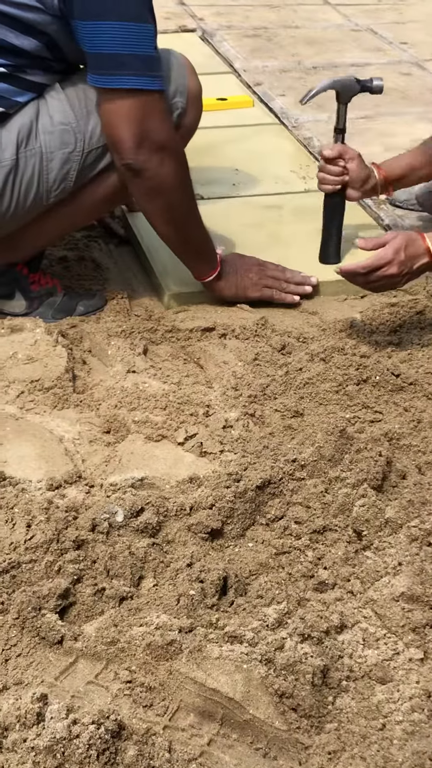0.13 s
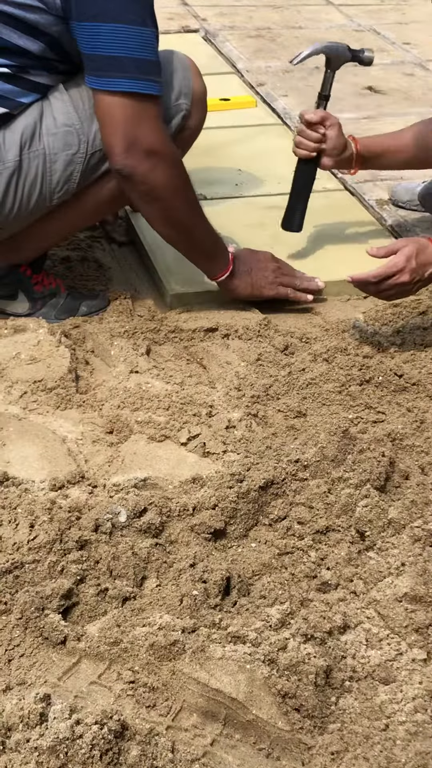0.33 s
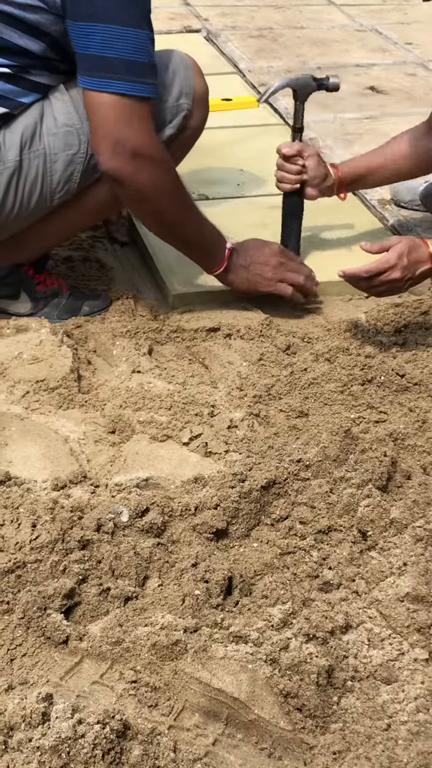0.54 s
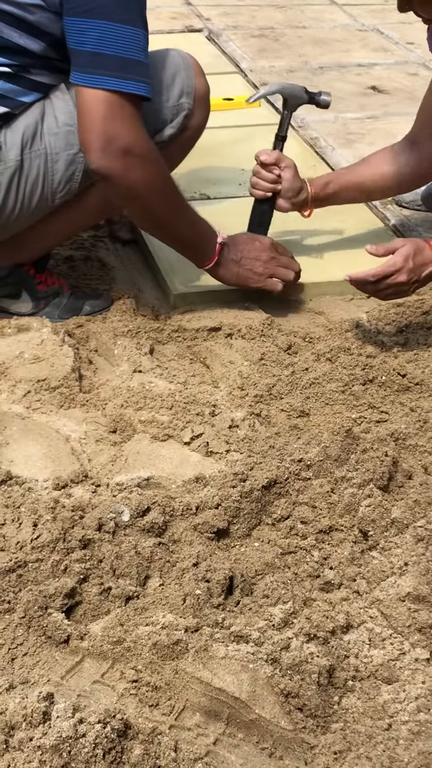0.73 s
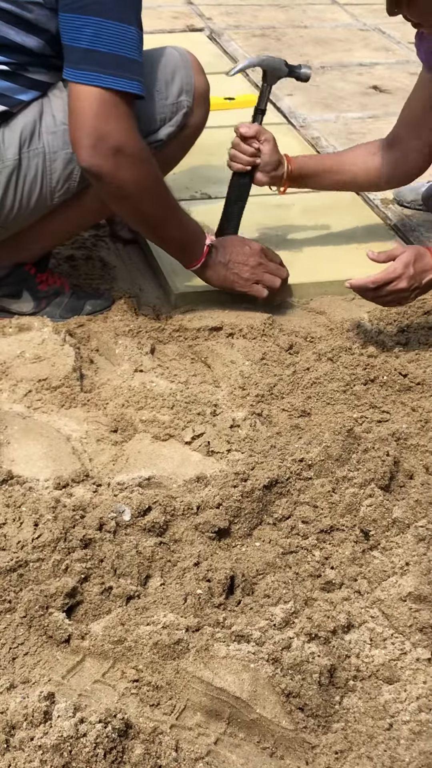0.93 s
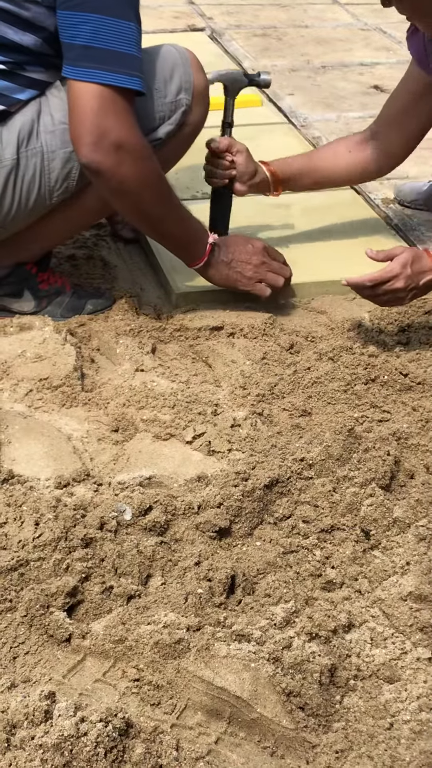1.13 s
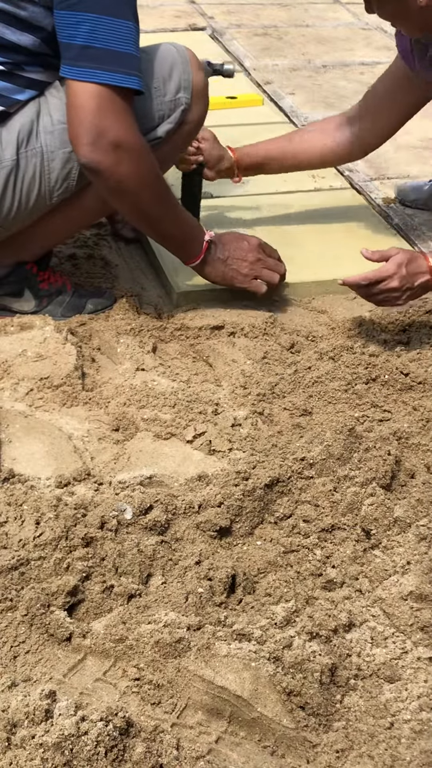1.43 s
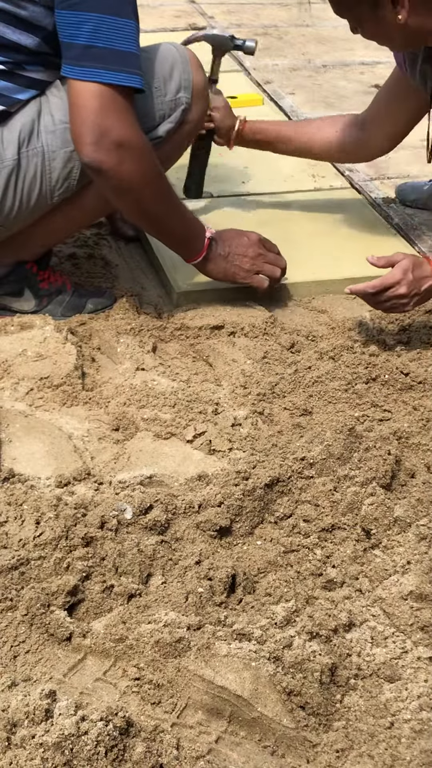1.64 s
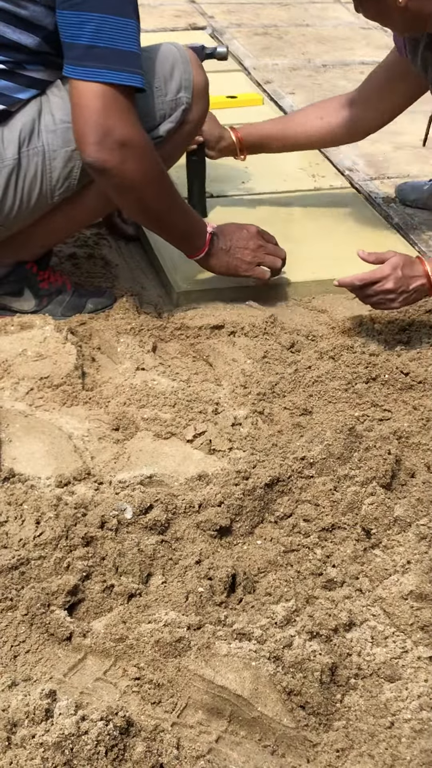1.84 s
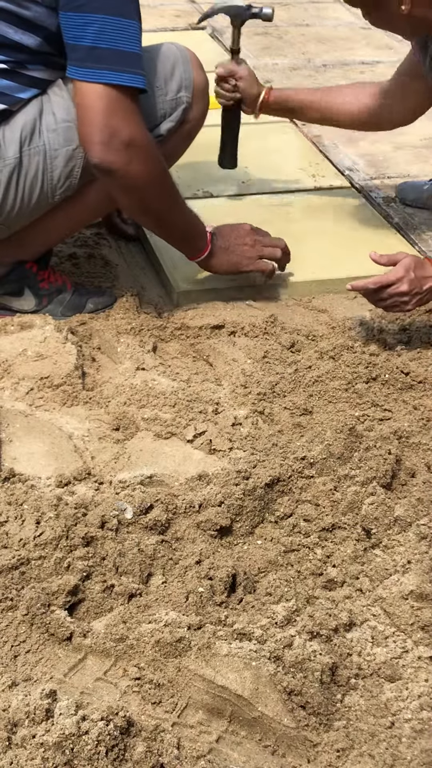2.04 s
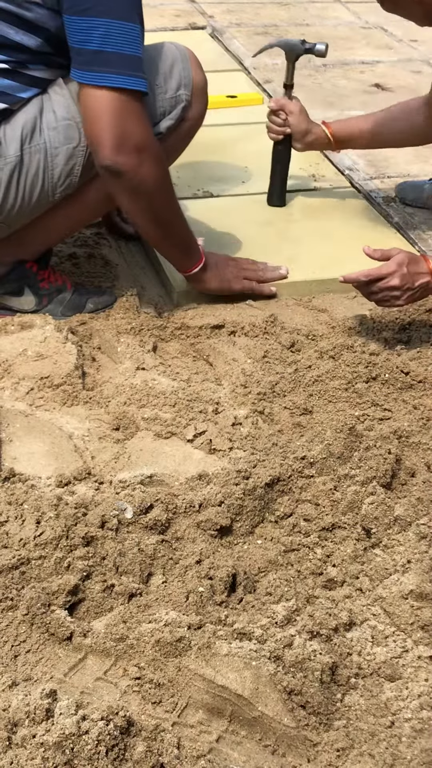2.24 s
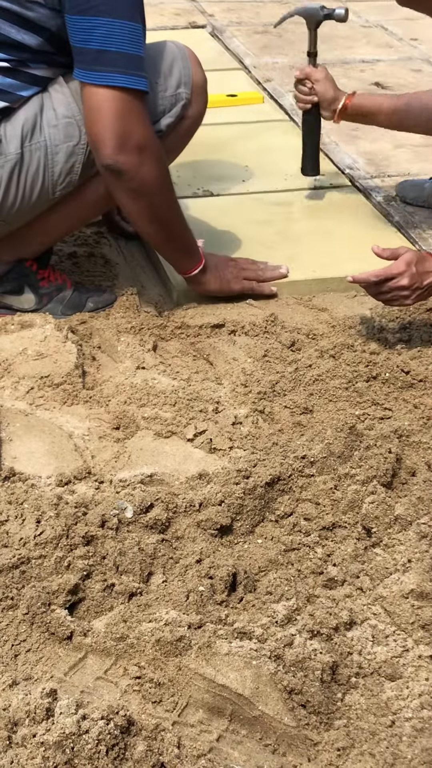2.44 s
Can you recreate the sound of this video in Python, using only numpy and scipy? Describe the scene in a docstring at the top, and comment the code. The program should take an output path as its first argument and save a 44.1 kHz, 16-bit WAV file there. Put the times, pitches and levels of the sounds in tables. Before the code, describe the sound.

Seven dull hammer-handle knocks on a paving slab bedded in sand, with tiny metallic clinks outdoors

```python
"""First a low outdoor rumble with hiss and a soft scuff of sand, then seven hammer-handle knocks.
The butt strikes a paving slab bedded in sand: each blow is a slab bounce, damped ringing modes and
a noise tick, with a late low thump from the ground. Something small and metallic, perhaps a bracelet,
clinks around the blows (shaped noise and sines). Scuffs are grainy band noise; a faint far-off tone
comes and goes twice. One microphone hears it all, with a short diffuse tail and one near reflection."""
import sys
import numpy as np
from scipy import signal
from scipy.fft import rfft, irfft
from scipy.io import wavfile

SR = 44100
rng = np.random.default_rng(int(sys.argv[2]) if len(sys.argv) > 2 else 0)


def transcribe(u):
    """Save the signal u as a 16-bit wav file named by the first command-line argument.

    u: samples, shape (n,) or (channels, n), limited to [-1, 1]; the rate is SR.
    q: integer samples, one column per channel.
    """
    v = np.clip(np.atleast_2d(u).T, -1, 1)
    q = np.round(v * 32767).astype(np.int16)
    wavfile.write(sys.argv[1], SR, q)


N = 114660  # length of the scene [samples]
T = np.arange(int(0.4 * SR)) / SR  # time within one short sound [s]

# The blows: (time [s], strength [dB], overtones [dB], edge modes [dB], 1 kHz ring [dB],
#             contact tick [dB], tick tilt [dB per octave], overtone tuning [ratio])
KNOCKS = [(0.2036, 2, 4.5, -2.5, 2.5, -41, 1.5, 1.023), (0.5209, -1, -9, -2.5, -3.5, -42.5, 0.5, 1.027),
          (0.8198, -2, -18.5, -11.5, -25, -43.5, -2.5, 0.98), (1.105, -4.5, -20.5, -9, -20, -52.5, 2, 1.03),
          (1.4303, -4, -62, -10, -10.5, -50, 1.5, 0.74), (1.807, -2, -9.5, 2, -12, -44, 1, 0.894),
          (2.262, -1, 1, -5.5, 3, -35, -2, 1)]
# Slab overtones before each blow's tuning and level: (pitch [Hz], level [dB], t60 [s])
OVERTONES = [(286.2, -15, 0.038), (344.4, -21, 0.033), (467.6, -20.5, 0.034), (520.6, -24, 0.023)]
# Modes that ring more for some striking places: (pitch [Hz], level [dB], t60 [s])
EDGE_MODES = [(429, -28.5, 0.039), (690, -28.5, 0.033), (774, -35.5, 0.043), (1673, -36.5, 0.03),
              (1860, -34, 0.012)]
# The slab's ring near 1 kHz, with its own level in each blow: (pitch [Hz], level [dB], t60 [s])
KILOHERTZ_RING = [(992.4, -30.5, 0.04), (1103, -40.5, 0.028)]
# Spectrum of the contact tick before tilt: (frequency [Hz], relative level [dB])
TICK_SPECTRUM = [(300, 12), (1200, -9.5), (2800, -6), (4500, -13), (6800, -6), (8500, -24.5), (16000, -22)]
# The late answer of the ground: (pitch [Hz], level [dB], t60 [s], lag [s])
GROUND_MODES = [(58.6, -24, .12, 0.0162), (118.2, -44, 0.47, 0.01976), (171.6, -33.5, 0.19, 0.03145)]
# Metal contacts: (time [s], level [dB], tilt [dB per octave], ring [dB])
CLINKS = [(0.3251, -59, -4, -24), (0.5327, -33, -0.5, -7), (0.561, -59, -3, 3), (0.8163, -47.5, -2, -10),
          (.832, -47, -2, -7), (1.0972, -44, -5, -4), (1.118, -54.5, -7, -5), (1.144, -59, -5, -10),
          (1.4692, -43.5, -5, -1), (1.4798, -48, -13.5, 4), (1.5361, -47.5, -7, -12),
          (1.834, -62, -13, -10), (1.8553, -52.5, -10.5, -14), (1.9014, -50.5, -5, -13),
          (2.289, -57.5, -12, -14), (2.3432, -47.5, -3, -10), (2.3502, -57, 4, -12),
          (2.4631, -45.5, -1, -3), (2.4912, -52, -4, -3)]
# Spectrum of the metal snap before tilt: (frequency [Hz], relative level [dB])
CLINK_SPECTRUM = [(1500, -46), (3000, -24), (4300, 1.5), (5100, -23.5), (6300, 8), (7600, 0), (8900, 3.5),
                  (10800, 2), (12000, 2.5), (13500, -1.5), (16000, -2)]
# Pitches at which the metal rings: (pitch [Hz])
CLINK_HZ = [6700, 8270, 11970, 12470, 15000]
# Ring of each of those pitches: (relative level [dB], t60 [s])
CLINK_MODES = [(-20, .045), (-28, 0.055), (-12, .065), (-54, 0.033), (-43, 0.032)]
# Sand under hands and slab: (time [s], length [s], level [dB], centre [Hz])
SCUFFS = [(0.094, 0.096, -69, 5600), (0.107, 0.027, -64.5, 2450), (0.206, 0.12, -73, 5900),
          (.42, 0.073, -70.5, 5650), (0.868, 0.031, -60.5, 1600), (0.869, 0.036, -69, 5440),
          (0.877, 0.28, -70.5, 1830), (2.028, 0.091, -75, 3420), (2.282, 0.056, -68.5, 5840)]
# Far-off tones: (time [s], length [s], level [dB], pitch halfway [Hz])
FAR_TONES = [(0.941, 0.21, -62.5, 961), (1.621, 0.13, -65.5, 960)]
# Spectrum of the outdoor air: (frequency [Hz], relative level [dB])
AIR_SPECTRUM = [(12, -21), (20, -1.5), (70, 3), (198, -11), (277, -16.5), (367, -22), (698, -24),
                (825, -25.5), (949, -21.5), (1260, -27.5), (2820, -34), (3630, -32.5), (4540, -37.5),
                (5680, -37.5), (10200, -44), (14300, -44), (16000, -47.5)]
# Decay of the diffuse outdoor tail: (frequency [Hz], t60 [s])
YARD_DECAY = [(100, 0.051), (300, 0.21), (1000, 0.29), (4000, 0.07), (12000, 0.27)]

# The whole slab on its bed
BOUNCE_HZ, BOUNCE_DB, BOUNCE_T60_S, BOUNCE_RISE_S, BOUNCE_LAG_S = 181.3, -9, 0.038, 0.0039, 0.0012
FULL_BRIGHT_HZ = 454  # from this pitch up, a blow's overtone dB applies in full
MODE_RISE_S = 0.0026  # overtones, edge modes and 1 kHz ring
TICK_T60_S, TICK_TAIL_DB, TICK_TAIL_T60_S = 0.016, -14, 0.12
# The hard first instant of contact
CRACK_HZ, CRACK_DB, CRACK_T60_S, CRACK_RISE_S = 2890, 10.5, 0.0018, 0.00015
GROUND_RISE_S = 0.002
CLINK_T60_S, CLINK_TAIL_DB, CLINK_TAIL_T60_S, CLINK_RISE_S = 0.0067, -18, 0.096, 0.00034
FAINT_PER_S, FAINT_DB, FAINT_SPREAD_DB = 15, -64, 5  # the clinks that fall at random
SCUFF_OCTAVES, SCUFF_GRAIN_DB = 0.38, 3
AIR_DB, AIR_WAVER_DB, RUMBLE_TOP_HZ = -53, 2.92, 302
FAR_RISE_HZ_PER_S, FAR_WOBBLE_HZ, FAR_FLUTTER_DB = 120, 23.7, 3.5
YARD_DB, CLINK_YARD_DB, YARD_GAP_S = -12.5, -26.5, 0.0067
WALL_S, WALL_DB, WALL_TOP_HZ = 0.0275, -24, 1500  # one near reflection
LOW_CUT_HZ, EDGE_HZ = 31, 16000  # the microphone's range


def amp(db):
    """Decibels to gain."""
    return 10 ** (np.asarray(db) / 20)


def unit(x):
    """Scales to rms 1."""
    return x / np.sqrt(np.mean(x ** 2) + 1e-20)


def read(points, hz):
    """Reads a table on a log-frequency axis."""
    f, value = np.transpose(points)
    return np.interp(np.log(hz + 1), np.log(f + 1), value)


def add(mix, s, sound):
    """Mixes a sound in at time s, cut off at the end of the mix."""
    part = mix[max(round(s * SR), 0):][:len(sound)]
    part += sound[:len(part)]


def fade(t, t60):
    """Exponential decay, 60 dB down after t60 seconds."""
    return np.exp(-np.log(1000) * t / t60)


def mode(hz, db, t60, rise_s, lag_s=0):
    """A damped sine that swells in after a lag."""
    t = np.maximum(T - lag_s, 0)
    swell = 1 - np.exp(-t / rise_s)
    return amp(db) * swell * fade(t, t60) * np.sin(2 * np.pi * hz * t)


def noise(points, size, tilt_db=0):
    """Noise of rms 1 with a given spectrum, tilted above 1 kHz by so many dB per octave."""
    hz = np.fft.rfftfreq(size, 1 / SR)
    db = read(points, hz) + tilt_db * np.log2(np.maximum(hz, 1000) / 1000)
    return unit(irfft(rfft(rng.standard_normal(size)) * amp(db), size))


def band(x, hz, octaves):
    """Keeps a bell-shaped band, at rms 1."""
    away = np.log2((np.fft.rfftfreq(len(x), 1 / SR) + 1) / hz) / octaves
    return unit(irfft(rfft(x) * np.exp(-0.5 * away ** 2), len(x)))


def lowpass(top_hz):
    """A second-order filter that keeps what lies below top_hz."""
    return signal.butter(2, top_hz, fs=SR, output="sos")


def slab_ring(bright_db, edge_db, kilohertz_db, tuning):
    """The slab bounces on its bed and rings the modes that the striking place favours."""
    ring = mode(BOUNCE_HZ, BOUNCE_DB, BOUNCE_T60_S, BOUNCE_RISE_S, BOUNCE_LAG_S)
    for hz, db, t60 in OVERTONES:
        # The blow's brightness counts more the higher the overtone lies above the bounce
        share = np.clip(np.log(hz / BOUNCE_HZ) / np.log(FULL_BRIGHT_HZ / BOUNCE_HZ), 0, 1)
        ring = ring - mode(hz * tuning, db + share * bright_db, t60, MODE_RISE_S)
    for modes, place_db in (EDGE_MODES, edge_db), (KILOHERTZ_RING, kilohertz_db):
        for hz, db, t60 in modes:
            ring = ring - mode(hz, db + place_db, t60, MODE_RISE_S)
    return ring


def contact_tick(tilt_db):
    """The handle meets stone: a noise burst with a weaker, longer tail, plus a very short crack."""
    decay = fade(T, TICK_T60_S) + amp(TICK_TAIL_DB) * fade(T, TICK_TAIL_T60_S)
    burst = noise(TICK_SPECTRUM, len(T), tilt_db) * decay
    return burst + mode(CRACK_HZ, CRACK_DB, CRACK_T60_S, CRACK_RISE_S)


def slab():
    """Ring and contact tick of every blow, with the outdoor tail and a dull near reflection."""
    direct = np.zeros(N)
    for s, db, bright_db, edge_db, kilohertz_db, tick_db, tilt_db, tuning in KNOCKS:
        ring = slab_ring(bright_db, edge_db, kilohertz_db, tuning)
        add(direct, s, amp(db) * ring + amp(tick_db) * contact_tick(tilt_db))
    heard = direct + amp(YARD_DB) * yard(direct)
    reflection = signal.sosfilt(lowpass(WALL_TOP_HZ), direct)
    add(heard, WALL_S, amp(WALL_DB) * reflection)
    return heard


def ground():
    """A low, late thump from the ground under every blow, made of lagging damped modes."""
    out = np.zeros(N)
    thump = -sum(mode(hz, db, t60, GROUND_RISE_S, lag) for hz, db, t60, lag in GROUND_MODES)
    for s, db, *_ in KNOCKS:
        add(out, s, amp(db) * thump)
    return out


def clinks():
    """Tiny metal contacts: a bright noise snap with a brief high ring; faint snaps fall at random."""
    out = np.zeros(N)
    decay = fade(T, CLINK_T60_S) + amp(CLINK_TAIL_DB) * fade(T, CLINK_TAIL_T60_S)
    ring = sum(mode(hz, db, t60, CLINK_RISE_S) for hz, (db, t60) in zip(CLINK_HZ, CLINK_MODES))
    for s, db, tilt_db, ring_db in CLINKS:
        snap = noise(CLINK_SPECTRUM, len(T), tilt_db) * decay
        add(out, s, amp(db) * (snap + amp(ring_db) * ring))
    hits = rng.random(N) < FAINT_PER_S / SR
    faint = hits * amp(FAINT_DB + FAINT_SPREAD_DB * rng.standard_normal(N))
    out += signal.fftconvolve(faint, noise(CLINK_SPECTRUM, len(T)) * decay)[:N]
    return out + amp(CLINK_YARD_DB) * yard(out)


def scuffs():
    """Short rubs of sand: band noise with uneven grains that starts quickly and trails off."""
    out = np.zeros(N)
    for s, length, db, hz in SCUFFS:
        grains = rng.standard_normal(len(T)) * amp(SCUFF_GRAIN_DB * rng.exponential(1, len(T)))
        swell = np.sin(np.pi * np.minimum(T / length, 1) ** 0.38)  # power below 1: early peak
        add(out, s, amp(db) * swell * band(grains, hz, SCUFF_OCTAVES))
    return out


def yard(x):
    """Short diffuse outdoor tail: noise that swells in, then dies at its own speed in each band."""
    hz, t, z = signal.stft(rng.standard_normal(len(T)), SR, nperseg=256)
    decaying = z * fade(t, read(YARD_DECAY, hz)[:, None])
    tail = signal.istft(decaying, SR, nperseg=256)[1][:len(T)]
    tail = tail * np.minimum(T / YARD_GAP_S, 1) ** 2
    return signal.fftconvolve(x, tail / np.linalg.norm(tail))[:N]


def far_tone(length, db, hz):
    """A distant tone: a sine that rises in pitch, wobbles and flutters in level under one swell."""
    wobble = noise([(1, 0), (60, 0), (200, -60)], len(T))
    pitch = hz + FAR_RISE_HZ_PER_S * (T - length / 2) + FAR_WOBBLE_HZ * wobble
    flutter = noise([(1, 0), (20, 0), (60, -60)], len(T))
    swell = amp(db + FAR_FLUTTER_DB * flutter) * np.sin(np.pi * np.minimum(T / length, 1))
    return swell * np.sin(2 * np.pi * np.cumsum(pitch) / SR)


def outdoors():
    """Background air: steady hiss over a low rumble of slowly wavering level, with the far tones."""
    waver = noise([(1, 0), (8, -3), (30, -40), (100, -120)], N)
    air = amp(AIR_DB) * noise(AIR_SPECTRUM, N)
    rumble = signal.sosfiltfilt(lowpass(RUMBLE_TOP_HZ), air)
    out = air + rumble * (amp(AIR_WAVER_DB * waver) - 1)  # only the rumble wavers
    for s, length, db, hz in FAR_TONES:
        add(out, s, far_tone(length, db, hz))
    return out


def scene():
    """All sources, near and far, at one microphone."""
    return (slab() + ground() + clinks() + scuffs() + outdoors())[None]


def record(dry):
    """The microphone sheds the deepest bass, then a steep filter limits the treble."""
    thinned = signal.sosfilt(signal.butter(3, LOW_CUT_HZ, "high", fs=SR, output="sos"), dry)
    treble_limit = signal.firwin(401, EDGE_HZ, window=("kaiser", 9), fs=SR)
    return signal.oaconvolve(thinned, treble_limit[None], "same")


dry = scene()
out = record(dry)
transcribe(out)
```